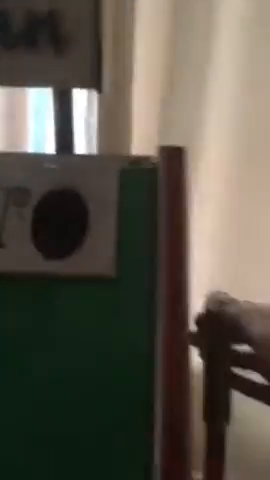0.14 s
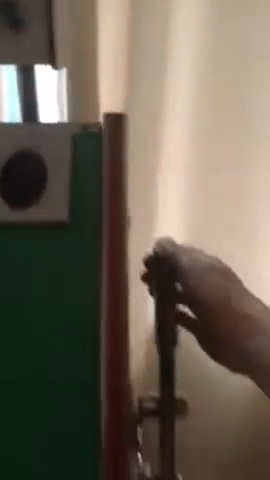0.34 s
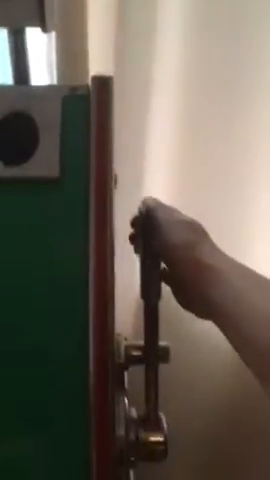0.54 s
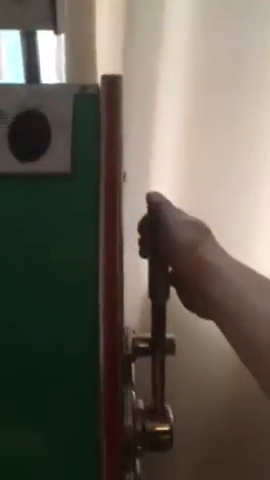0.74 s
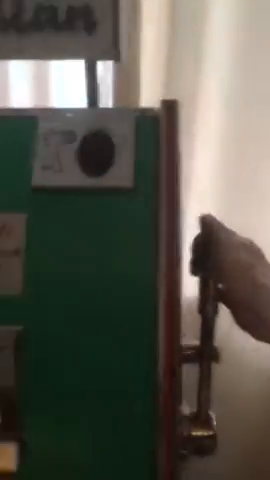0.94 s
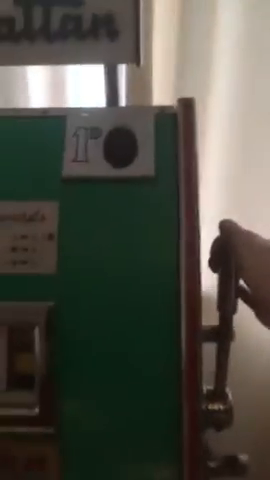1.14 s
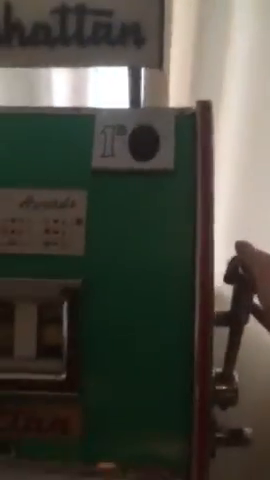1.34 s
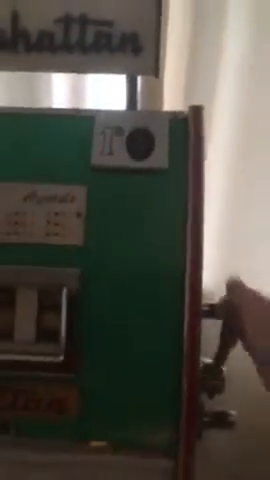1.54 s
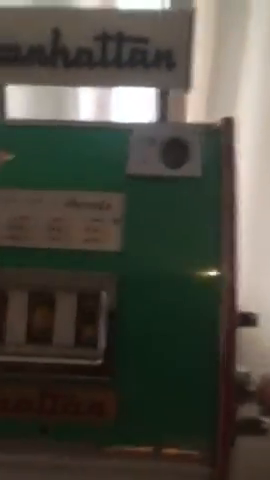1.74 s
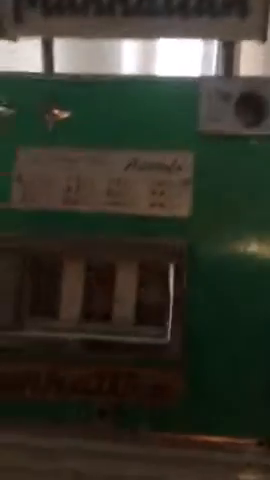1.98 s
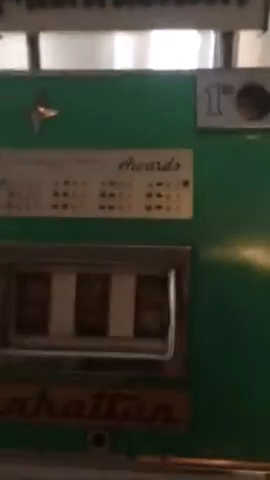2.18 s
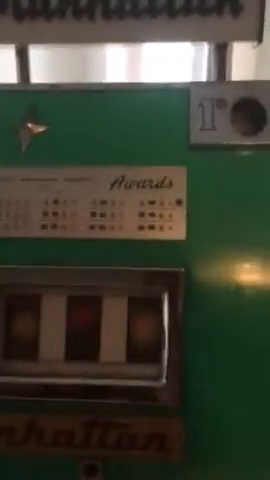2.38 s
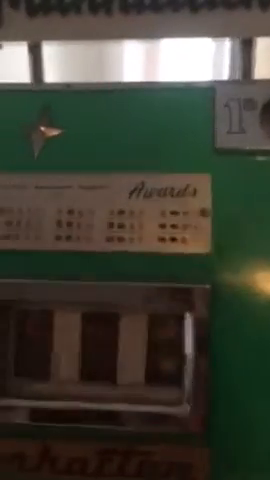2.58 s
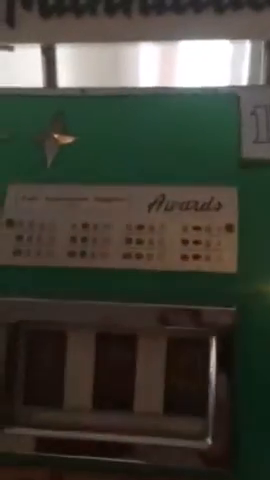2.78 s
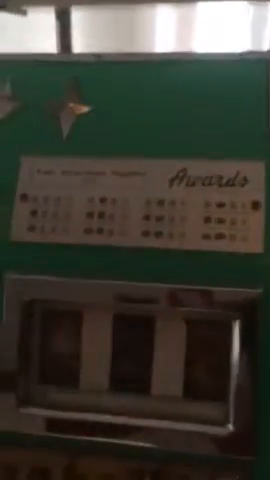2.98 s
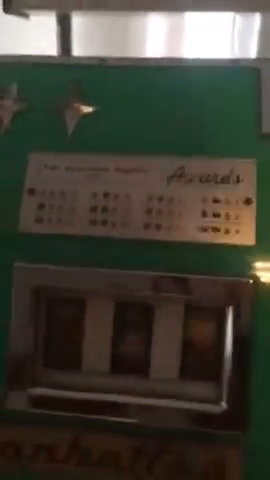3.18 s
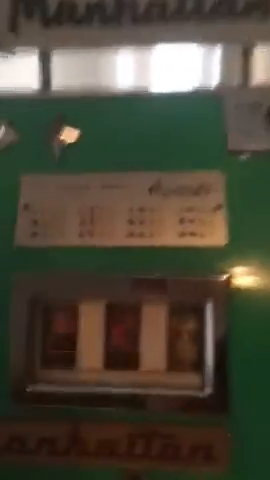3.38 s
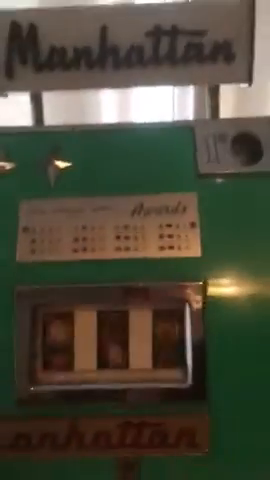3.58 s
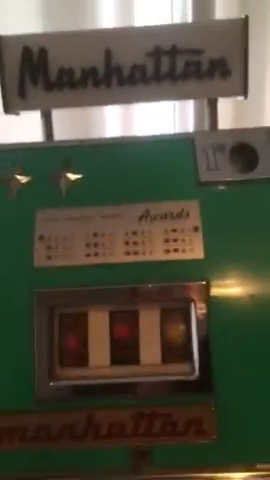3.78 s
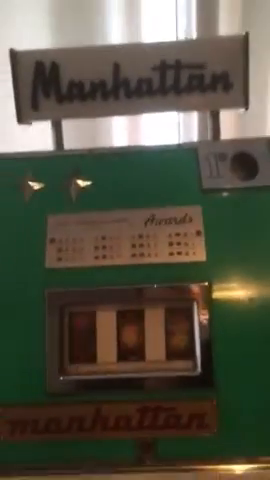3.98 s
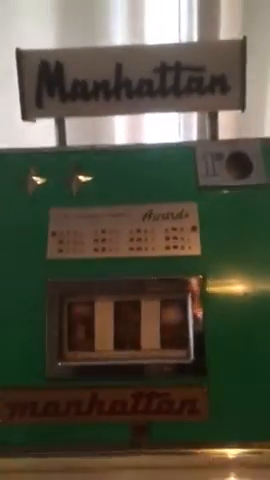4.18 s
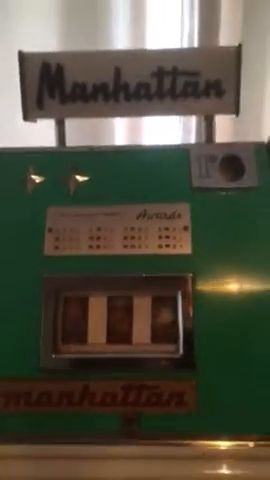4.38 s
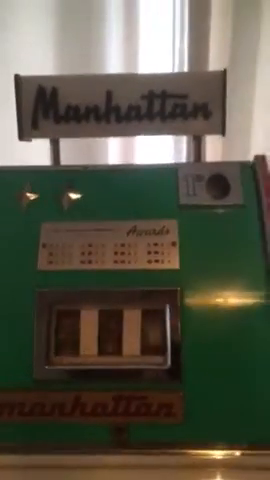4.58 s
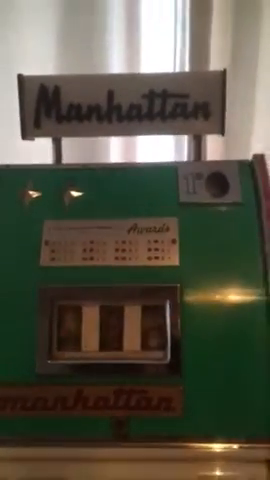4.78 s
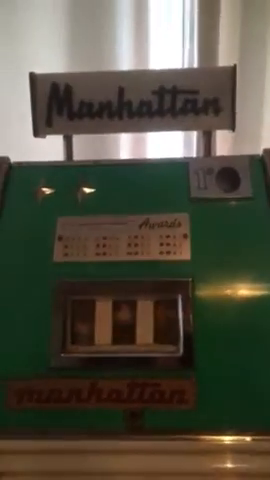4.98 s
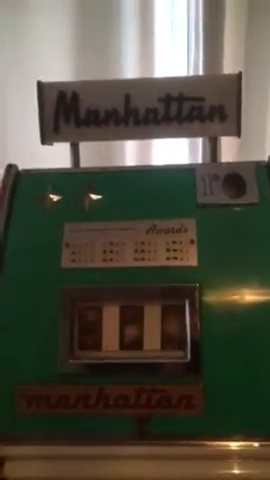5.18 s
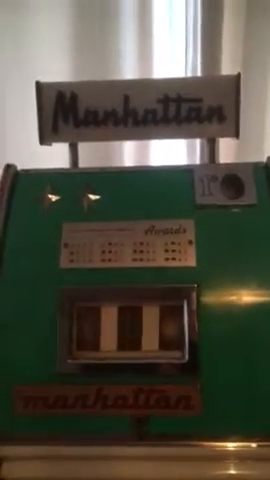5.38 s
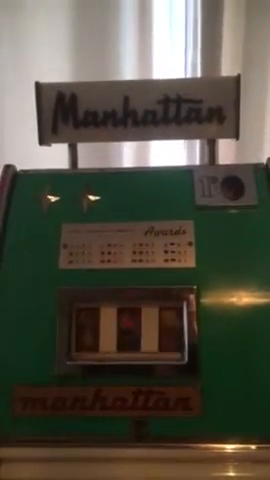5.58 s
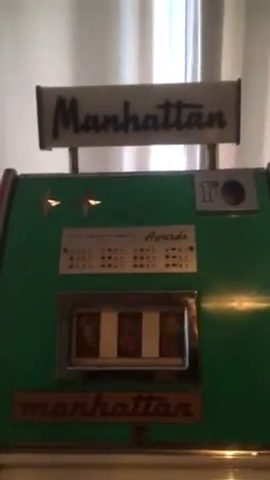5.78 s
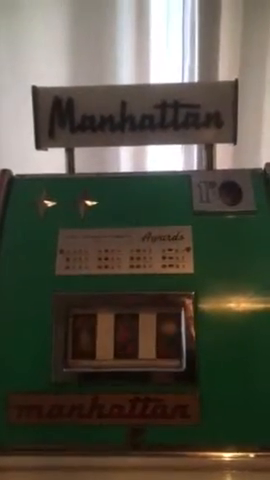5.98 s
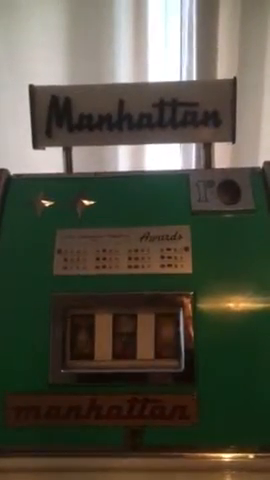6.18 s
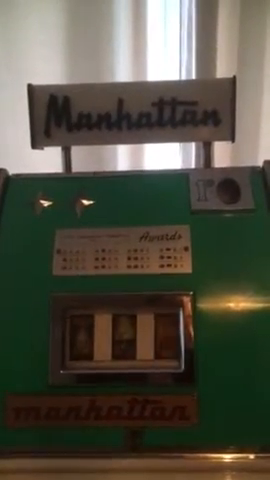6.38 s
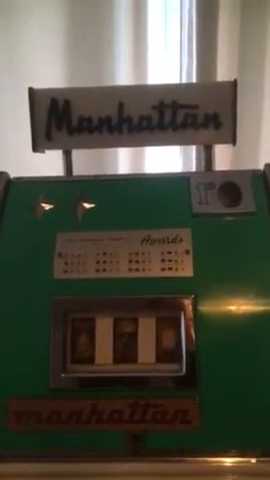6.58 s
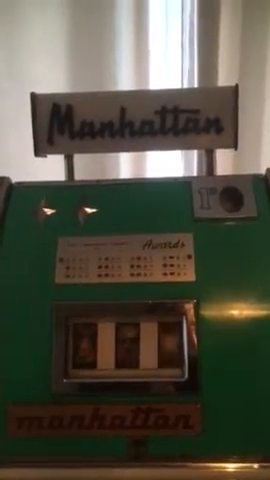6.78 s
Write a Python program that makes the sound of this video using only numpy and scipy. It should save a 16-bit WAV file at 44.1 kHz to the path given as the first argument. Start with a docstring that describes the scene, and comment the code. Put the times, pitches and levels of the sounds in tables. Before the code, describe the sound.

An old mechanical slot machine's lever rubs and ratchets, clunks hard, a coin rings down a metal chute, then the clockwork whirs and reels clack to rest.

```python
"""An old one-armed bandit in a quiet room, over steady hum and hiss made of banded noise.
The lever rubs (noise with a squeak), clicks over a ratchet and trips the mechanism with a clunk that booms
the cabinet: blows are decaying noise bands, clear notes decaying sines. The coin rings down its chute into
the cash box. A clockwork governor whirs as trains of ticks to the end; stop arms drop, and a reel
coasts on, tooth by tooth, then rocks to rest."""
import sys
import numpy as np
from scipy import signal
from scipy.fft import next_fast_len
from scipy.io import wavfile

SR = 44100
rng = np.random.default_rng(int(sys.argv[2]) if len(sys.argv) > 2 else 0)


def generate_wav(sig):
    """Save sig (samples, or channels by samples) to the path in sys.argv[1] as 16-bit PCM at SR."""
    pcm = np.round(np.clip(np.atleast_2d(sig).T, -1, 1) * 32767).astype(np.int16)
    wavfile.write(sys.argv[1], SR, pcm)


N = 301644
TIME = np.arange(N) / SR
RING_TIME = TIME[:SR * 3 // 4]
BAND_HZ = 1000 * 2 ** (np.arange(-14, 13) / 3)   # third octaves
BOUNCE_S = 0.01

# pawl drops over the ratchet teeth: start_s
RATCHET_S = [1.6013, 1.6552, 1.7, 1.7443, 1.7608, 1.8076]
# frame resonances: centre_hz, width_hz, boost_db
FRAME_PEAKS = [(429, 50, 8), (614, 9.8, 6.5), (1086, 6.3, 6), (1485, 22, 3.5)]
# colour of blows on arms and reels: band_hz, level_db (per third octave)
STOP_COLOUR = [(60, -17), (110, -17), (200, 5.5), (400, -8), (550, -14), (800, -11), (1300, -13),
               (2600, -18.5), (3600, -8.5), (5500, -8.5), (9000, -13.5), (15000, -16.5)]


def from_db(db):
    """Decibels to gain."""
    return 10 ** (np.asarray(db) / 20)


def per_band(points):
    """Spectrum (Hz, dB) read at the band centres, as a column."""
    hz, level_db = np.transpose(points)
    return np.interp(np.log(BAND_HZ), np.log(hz), level_db)[:, None]


def coloured(bands, colour):
    """Noise with the given third-octave spectrum."""
    return from_db(per_band(colour)[:, 0]) @ bands


def add(out, start_s, sound):
    """Mix a sound in at its start time."""
    at = round(start_s * SR)
    out[at:at + len(sound)] += sound[:N - at]


def noise_bands():
    """Third-octave bands of noise, each with rms 1."""
    white = rng.standard_normal((2, N + SR))
    edge = 2 ** (1 / 6)
    bands = []
    for k, hz in enumerate(BAND_HZ):
        sos = signal.butter(2, [hz / edge, hz * edge], "band", fs=SR, output="sos")
        bands.append(signal.sosfilt(sos, white[k % 2])[SR:])   # drop the filter's settling
    bands = np.array(bands)
    return bands / bands.std(axis=1, keepdims=True)


def drift(knots_per_s):
    """Random wander: straight lines between normal knots of spread 1."""
    knots = rng.standard_normal(N // 100)
    return np.interp(TIME * knots_per_s, np.arange(len(knots)), knots)


def resonate(x, peaks):
    """Two-pole resonators in parallel with the sound lift each peak in turn."""
    for hz, width_hz, boost_db in peaks:
        r = np.exp(-np.pi * width_hz / SR)
        zeros = np.array([1, 0, -1]) * (1 - r * r) / 2
        poles = [1, -2 * r * np.cos(2 * np.pi * hz / SR), r * r]
        x = x + (from_db(boost_db) - 1) * signal.lfilter(zeros, poles, x)
    return x


def ring(modes, hits, spread_db, rise_s):
    """Each hit (s, dB) sets every mode (Hz, dB, t60 s) ringing with a strength of its own."""
    hz, mode_db, t60_s = np.transpose(modes)[:, :, None]
    envelope = from_db(mode_db - 60 * RING_TIME / t60_s) * (1 - np.exp(-RING_TIME / rise_s))
    waves = envelope * np.sin(2 * np.pi * hz * RING_TIME)
    out = np.zeros(N)
    for start_s, level_db in hits:
        add(out, start_s, from_db(level_db + spread_db * rng.standard_normal(len(hz))) @ waves)
    return out


def blows(bands, hits, colour, alike, bass_slowness, tail_db, tail_t60_s, rise_cycles):
    """Hits (s, click dB, clack dB, thud dB, t60 s at 1 kHz) excite crowded modes: crack, then case and room."""
    size, hz = len(RING_TIME), BAND_HZ[:, None]
    starts = rng.integers(0, N - size, len(hits) + 1)
    body = bands[:, starts[0]:starts[0] + size]
    slow = (1000 / hz) ** bass_slowness   # low modes last longer
    rise = 1 - np.exp(-RING_TIME * hz / rise_cycles)   # and build up later
    fall = -np.log(1000) * RING_TIME / slow
    tail = from_db(tail_db) * slow * np.exp(fall / tail_t60_s)
    out = np.zeros(N)
    for at, (start_s, click_db, clack_db, thud_db, t60_s) in zip(starts[1:], hits):
        force = per_band([(230, thud_db), (500, clack_db), (1800, clack_db), (4000, click_db)])
        strength_db = force + per_band(colour)
        # the same body answers every blow, a little differently each time
        modes = np.sqrt(alike) * body + np.sqrt(1 - alike) * bands[:, at:at + size]
        envelope = rise * (np.exp(fall / t60_s) + tail)
        add(out, start_s, from_db(strength_db[:, 0]) @ (modes * envelope))
    return out


def jangle(hits, low_hz, high_hz, max_db, mean_t60_s, count):
    """Crowded steel parts ring briefly; each hit (s, click dB, clack dB) finds different ones."""
    out = np.zeros(N)
    brief = RING_TIME[:SR // 5]
    for start_s, click_db, clack_db, *_ in hits:
        place, life, force = rng.random((count, 3)).T[:, :, None]
        hz = low_hz * (high_hz / low_hz) ** place
        level_db = np.where(hz > 3000, click_db, clack_db) + max_db + 20 * np.log10(force + 1e-9)
        decay = from_db(level_db - 60 * brief / (mean_t60_s * (.5 + life)))
        add(out, start_s, np.sum(decay * np.sin(2 * np.pi * hz * brief), axis=0))
    return out


def fluttering(x, bands):
    """A note flutters in level and phase as the part that carries it turns and grazes its neighbours."""
    phase_rad = .6 * drift(knots_per_s=110)
    turned = np.real(signal.hilbert(x, next_fast_len(N))[:N] * np.exp(1j * phase_rad))
    return turned * (1 + .1 * bands[BAND_HZ < 260].sum(axis=0))


def contact(start_s, level_db, hardness_db, thud_db):
    """A blow as (s, click dB, clack dB, thud dB): hardness adds click and takes away thud."""
    return start_s, level_db + hardness_db, level_db, level_db + thud_db - 0.19 * hardness_db


def room(bands):
    """Steady hum and hiss: noise bands, played backwards."""
    # room noise: band_hz, level_db (per third octave)
    room_colour = [(30, -82), (45, -74), (70, -75.5), (110, -79.5), (200, -72.5), (320, -82), (550, -85),
                   (900, -84), (2000, -88.5), (15000, -86)]
    return coloured(bands[:, ::-1], room_colour)


def rubbing(fade_db_per_s):
    """Strength of the rub: each stroke swells, drifts in level and lets go."""
    # lever strokes: start_s, end_s, level_db
    strokes = [(0.25, 0.49, -73), (1.075, 1.64, -60), (1.642, 1.954, -57.5)]
    edge_s = 0.047
    strength = np.zeros(N)
    for start_s, end_s, level_db in strokes:
        gate = np.clip(np.minimum(TIME - start_s, end_s - TIME) / edge_s, 0, 1)
        strength += from_db(level_db - fade_db_per_s * np.clip(TIME - start_s, 0, 1)) * gate
    return strength


def lever_rub(bands):
    """The lever rubs in its bearing, which grips and eases; a faint squeak bends with the grip."""
    # rub colour: band_hz, level_db (per third octave)
    rub_colour = [(60, -18), (170, -14), (330, -16.5), (1400, -19.5), (3200, -19.5), (6000, -26),
                  (12000, -51)]
    # squeak resonances: centre_hz, width_hz, boost_db
    squeak_peaks = [(2030, 340, 14.5), (3410, 300, 6), (5400, 330, 6)]
    uneven_db, pitch_bend = 1.8, .035   # bend: share of pitch per unit of grip
    grip = drift(knots_per_s=14)
    friction = coloured(bands, rub_colour)
    bent_time = TIME + pitch_bend * np.cumsum(grip) / SR
    squeak = np.interp(bent_time, TIME, resonate(friction, squeak_peaks) - friction)
    # the squeak leads each stroke, the plain rub grows slightly
    strokes = rubbing(fade_db_per_s=-2) * friction + rubbing(fade_db_per_s=16) * squeak
    return from_db(uneven_db * grip) * strokes


def low_rumble(bands):
    """Rumble below 90 Hz builds and dies away: faint at first, then strong at a heavy jolt of the cabinet."""
    # rumbles: start_s, level_db
    rumbles = [(.48, -60), (2.81, -44.5)]
    rise_s, t60_s = 0.024, 0.97
    strength = np.zeros(N)
    for start_s, level_db in rumbles:
        age_s = np.maximum(TIME - start_s, 0)
        strength += from_db(level_db - 60 * age_s / t60_s) * (1 - np.exp(-age_s / rise_s))
    return strength * bands[BAND_HZ < 90].sum(axis=0) * .5


def linkage_hits():
    """Knocks, ratchet teeth and clunks as (s, click dB, clack dB, thud dB, t60 s)."""
    # linkage knocks: start_s, level_db, hardness_db
    knock_rows = [(0.787, -53.5, 12.5), (0.9097, -49.5, 2), (0.9157, -56, -5), (0.969, -54.5, 4.5),
                  (1.0172, -51, -7.5), (1.385, -45, -11.5), (1.399, -54, -11), (1.8837, -35, 10),
                  (1.9408, -34.5, 8), (1.9789, -27.5, 8.5), (2.0019, -27, -18)]
    # one ratchet tooth: click_db, clack_db, thud_db (thud at the first tooth)
    tooth_db = (-30.5, -37, -47.5)
    # heavy levers landing: start_s, level_db
    clunk_rows = [(1.4382, -58.5), (1.852, -43), (1.872, -36.5), (2.0795, -43.5), (2.748, -47),
                  (2.7621, -44), (2.795, -54), (2.811, -49.5)]
    # a clunk about its level: click_db, clack_db, thud_db
    clunk_db = (-2.5, 2.5, 8.5)
    winding_db_per_s = 36.5   # the thud grows as the spring is wound
    knocks = [(*contact(*row, thud_db=0), 0.061) for row in knock_rows]
    teeth = []
    for start_s in RATCHET_S:
        wound_db = winding_db_per_s * (start_s - RATCHET_S[0])
        teeth.append((start_s, *np.add(tooth_db, (0, 0, wound_db)), 0.036))
    clunks = [(start_s, *np.add(clunk_db, level_db), 0.045) for start_s, level_db in clunk_rows]
    return knocks + teeth + clunks


def linkage(bands):
    """Linkage knocks, ratchet teeth and clunks strike the frame and jangle its steel parts."""
    # blow colour: band_hz, level_db (per third octave)
    knock_colour = [(60, -24), (110, -13.5), (190, 2), (330, -15), (600, -13), (1200, -6), (2100, -10.5),
                    (3300, -8.5), (5500, -14), (9000, -12.5), (15000, -22.5)]
    hits = linkage_hits()
    knocks = blows(bands, hits, knock_colour, alike=0.52, bass_slowness=0.19,
                   tail_db=-11.0, tail_t60_s=0.34, rise_cycles=2.43)
    metal = jangle(hits, low_hz=912, high_hz=10510, max_db=-16, mean_t60_s=0.07, count=24)
    return resonate(knocks, FRAME_PEAKS) + metal


def pings(bands):
    """Struck steel parts sing out as decaying sines: first the mechanism, then what the coin meets."""
    # modes: pitch_hz, level_db, t60_s; hits: start_s, level_db
    # latch, as the lever takes up its slack
    latch_modes = [(2020, -1.5, 0.094), (2480, 0, 0.056)]
    latch_hits = [(0.79, -49), (1.019, -47.5)]
    # pawl, on every tooth
    pawl_modes = [(946, -1.5, 0.047), (2520, -2, 0.081), (3066, 0.45, 0.069)]
    pawl_hits = [(start_s, -42.5) for start_s in RATCHET_S]
    # catch, snapping in near the end of the pull
    catch_modes = [(946, 2.5, 0.044), (3560, -3, .085), (9421, -6, 0.079)]
    catch_hits = [(1.763, -31.5)]
    # kicker
    kicker_modes = [(603, 1, 0.17), (1050, 4.5, 0.093), (1405, -8, 0.28), (1500, 2, 0.25),
                    (5590, 14.5, 0.022)]
    kicker_hits = [(1.981, -35.5)]
    # gate
    gate_modes = [(2820, 4, 0.092), (4600, -9, 0.14), (4700, -4, 0.18), (9130, -2.5, 0.31)]
    gate_hits = [(2.146, -39.5), (2.26, -39.5)]
    # coin grazing on its rim
    rim_modes = [(5800, 0, 0.28)]
    rim_hits = [(2.343, -40.5), (2.465, -38.5)]
    # chute
    chute_modes = [(3390, -5, 0.29), (4300, -9.5, 0.2), (6600, -6.5, 0.2)]
    chute_hits = [(2.351, -34)]
    # lip
    lip_modes = [(6600, -9, .09), (9335, -3, .15), (14030, -10, .13)]
    lip_hits = [(2.478, -34), (2.493, -40)]
    # cash box
    box_modes = [(1275, -8.5, 0.037), (2365, -6, 0.087), (3100, -4.5, 0.034), (3550, -1.5, 0.024)]
    box_hits = [(2.638, -29)]
    parts = [(latch_modes, latch_hits), (pawl_modes, pawl_hits), (catch_modes, catch_hits),
             (kicker_modes, kicker_hits), (gate_modes, gate_hits), (rim_modes, rim_hits),
             (chute_modes, chute_hits), (lip_modes, lip_hits), (box_modes, box_hits)]
    notes = sum(ring(modes, hits, spread_db=1.5, rise_s=.001) for modes, hits in parts)
    return fluttering(notes, bands)


def cabinet():
    """Heavy parts shake the cabinet: each thump favours the panels near its own pitch."""
    # panel modes: pitch_hz, level_db, t60_s
    panels = [(76.6, -18, 0.51), (141, -6, 0.16), (163, -1.5, 0.38), (207.4, -1.5, 0.35), (246, -4, 0.07),
              (338.2, -6, 0.066), (416, -14, 0.22)]
    # thumps: start_s, level_db, pitch_hz
    thumps = [(1.035, -44.5, 160), (1.184, -40.5, 168), (1.458, -38.5, 190), (1.876, -34, 268),
              (1.895, -36.5, 158), (1.984, -24.5, 264), (2.003, -19, 150), (2.023, -25, 206),
              (2.06, -30.5, 182), (2.14, -26, 212), (2.19, -34, 145), (2.518, -37.5, 206),
              (2.642, -35.5, 177), (2.754, -39.5, 163), (2.79, -28.5, 126), (2.821, -26, 208),
              (6.55, -41, 127)]
    off_pitch_db_per_octave = 25.5   # up to half an octave
    out = np.zeros(N)
    for start_s, level_db, pitch_hz in thumps:
        modes = []
        for hz, panel_db, t60_s in panels:
            off_octaves = min(abs(np.log2(hz / pitch_hz)), .5)
            modes.append((hz, panel_db - off_pitch_db_per_octave * off_octaves, t60_s))
        out += ring(modes, [(start_s, level_db)], spread_db=1.5, rise_s=0.0019)
    return out


def coin(bands):
    """The coin tumbles down the steel chute; its disc modes ring longer the longer it flies free."""
    # coin strikes: start_s, level_db, hardness_db, ring_db
    strikes = [(2.120, -36.5, 10.5, -53), (2.136, -30.5, -1.5, -28.5), (2.175, -33.5, 1.5, -44),
               (2.261, -50.5, 12, -50.5), (2.33, -44.5, 10, -60.5), (2.342, -38, 11.5, -42),
               (2.351, -45.5, 13.5, -29.5), (2.431, -55.5, 11.5, -38), (2.478, -55.5, 12, -45),
               (2.493, -50, 7, -44), (2.519, -42, 12, -23), (2.5286, -44, 20, -13), (2.543, -56, 8, -37),
               (2.574, -66, 9, -37.5), (2.597, -45.5, 7, -37.5), (2.637, -39.5, -3.5, -69.5)]
    # contact colour: band_hz, level_db (per third octave)
    contact_colour = [(60, -24), (190, 1.5), (400, -19.5), (1200, -8.5), (2400, -9), (4000, -18.5),
                      (7500, -10), (15000, -24)]
    # disc modes, some in close beating groups: pitch_hz
    disc_hz = [5655, 9852, 9871, 9770, 12900, 12922]
    # disc modes about ring_db: level_db
    disc_db = [-9.5, 0.5, -11, -16.5, -14.5, -9.5]
    t60_per_flight, rests_s = 3.1, 2.66
    hits = [(*contact(*row[:3], thud_db=-3), 0.092) for row in strikes]
    clatter = blows(bands, hits, contact_colour, alike=0.38, bass_slowness=0.16,
                    tail_db=-11.5, tail_t60_s=0.37, rise_cycles=2.8)
    chute = jangle(hits, low_hz=4200, high_hz=15770, max_db=-20.5, mean_t60_s=.12, count=60)
    flights_s = np.diff([row[0] for row in strikes] + [rests_s])
    disc = np.zeros(N)
    for (start_s, _, _, ring_db), flight_s in zip(strikes, flights_s):
        modes = [(hz, db, t60_per_flight * flight_s) for hz, db in zip(disc_hz, disc_db)]
        disc += ring(modes, [(start_s, ring_db)], spread_db=1.0, rise_s=0.004)
    return resonate(clatter, FRAME_PEAKS) + chute + fluttering(disc, bands)


def governor(bands):
    """The timing fan ticks three times a turn, over the low rush of the spinning reels."""
    # ticks in each turn: level_db
    tick_db = [0, -3, -11]
    # whir colour: band_hz, level_db (per third octave)
    whir_colour = [(60, -31), (200, -6.5), (330, -15.5), (650, -18), (950, -16), (2400, -12.5), (3200, -16),
                   (4500, -20), (7000, -21.5), (15000, -37.5)]
    # whir resonances: centre_hz, width_hz, boost_db
    whir_peaks = [(212.9, 4.2, 12), (796.3, 10, 18), (910, 44, 13.4), (1130, 190, 4.5), (1450, 160, 4.5),
                  (1830, 20, 5.5), (2020, 40, 6.6), (2384, 120, 6.5), (2567, 120, 9), (3880, 170, 9.1)]
    start_s, turns_per_s = 2.5585, 39.48
    uneven_db, jitter_s, tick_t60_s = 1.9, .0009, .048
    gain_db, rise_s, fade_db_per_s = -56.5, .07, 1

    gap_s = 1 / turns_per_s / len(tick_db)
    times = np.arange(start_s, TIME[-1] - gap_s, gap_s)
    at = ((times + jitter_s * rng.standard_normal(len(times))) * SR).astype(int)
    ticks = np.zeros(N)
    ticks[at] = from_db(np.resize(tick_db, len(at)) + uneven_db * rng.standard_normal(len(at)))

    # low notes ring through the gaps between ticks
    gain = from_db(per_band(whir_colour)[:, 0])
    crisp = 1 / (1 + (450 / BAND_HZ) ** 4)   # split at 450 Hz
    treble, bass = resonate(np.array([gain * crisp, gain * (1 - crisp)]) @ bands, whir_peaks)

    # a tick is part scrape, never the same twice, and part knock on the same frame
    decay = from_db(-60 * RING_TIME / tick_t60_s)
    scrape = signal.fftconvolve(ticks, decay)[:N] * treble
    knock = signal.fftconvolve(ticks, decay * treble[:len(decay)])[:N]

    age_s = np.maximum(TIME - start_s, 0)
    strength = from_db(gain_db - fade_db_per_s * age_s) * (1 - np.exp(-age_s / rise_s))
    return strength * ((knock + bass) / 2 + .8 * scrape)


def stop_arms(bands):
    """The stop arms fall into the star wheels, bounce once and ring the frame."""
    # arm landings: start_s, level_db, hardness_db
    stops = [(3.4175, -52, -15), (4.7026, -37, 0), (6.5299, -37.5, -5.5), (6.7126, -45, -15)]
    # resonances: centre_hz, width_hz, boost_db
    stop_peaks = [(633, 11, 15), (1480, 100, 7.1), (2320, 130, 11), (3220, 170, 7.4)]
    bounce_loss_db = 9
    hits = []
    for start_s, level_db, hardness_db in stops:
        for k in range(2):
            landing = contact(start_s + k * BOUNCE_S, level_db - k * bounce_loss_db, hardness_db, thud_db=-11.5)
            hits.append((*landing, 0.055))
    frame = blows(bands, hits, STOP_COLOUR, alike=0.76, bass_slowness=0.18,
                  tail_db=-13.5, tail_t60_s=0.29, rise_cycles=2.3)
    metal = jangle(hits, low_hz=996, high_hz=3790, max_db=-21, mean_t60_s=0.24, count=16)
    return resonate(frame, stop_peaks) + metal


def coasting():
    """The arm drops off each tooth and meets the next; drops spread out and soften as the reel slows."""
    # drop at full speed: click_db, clack_db, thud_db
    drop_db = (-56, -43, -46)
    # rebound at full speed: click_db, clack_db, thud_db
    rebound_db = (-56, -42.5, -54.5)
    start_s, first_tooth_s, teeth_to_rest, slowing_power = 4.7016, .07085, 8.247, .2094
    rebound_s, sooner_s_per_tooth = .0355, 0.0015
    drop_db_per_octave, rebound_db_per_octave = 4.5, 6   # softening per halving of speed
    speed = (1 - np.arange(int(teeth_to_rest) + 1) / teeth_to_rest) ** slowing_power
    tooth_times = start_s + np.cumsum(first_tooth_s / speed)
    drops = []
    rebounds = [(start_s + rebound_s, *rebound_db)]   # follows the stop arm's own blow
    for k, (tooth_s, octaves) in enumerate(zip(tooth_times, np.log2(speed)), 1):
        meeting_s = tooth_s + rebound_s - k * sooner_s_per_tooth
        drops.append((tooth_s, *np.add(drop_db, drop_db_per_octave * octaves)))
        rebounds.append((meeting_s, *np.add(rebound_db, rebound_db_per_octave * octaves)))
    return drops, rebounds


def arm_chatter(bands, drops, rebounds):
    """The arm's tip clicks ahead of each drop and clatters ahead of all but the first and last rebound."""
    # slip colour: band_hz, level_db (per third octave)
    slip_colour = [(500, -40), (1300, -20), (2600, -7), (3800, 2), (5500, -5.5), (9000, -7), (15000, -13.5)]
    lead_s, clatter_db = 0.0024, -56.5
    slips = [(start_s - lead_s, click_db, click_db, click_db, 0.037) for start_s, click_db, *_ in drops]
    clicks = blows(bands, slips, slip_colour, alike=0.22, bass_slowness=0.14,
                   tail_db=-14.0, tail_t60_s=0.16, rise_cycles=4.6)
    meetings = [(start_s - lead_s, clatter_db, clatter_db) for start_s, *_ in rebounds[1:-1]]
    return clicks + jangle(meetings, low_hz=1424, high_hz=4670, max_db=-4.5, mean_t60_s=0.075, count=10)


def stuttering(touches):
    """The arm never lands cleanly: a weaker touch follows each one after an uneven gap."""
    gaps_s = BOUNCE_S * (.5 + rng.random(len(touches)))
    return [(start_s + gap_s, *np.subtract(levels_db, 5))
            for (start_s, *levels_db), gap_s in zip(touches, gaps_s)]


def rocking():
    """The reel swings between two teeth, touching each in turn, in shorter swings that fade ever faster."""
    # soft side, then hard side: click_db, clack_db, thud_db
    sides_db = [(-67, -43.5, -54), (-53.5, -47, -54.5)]
    # loss, times the touch number squared: click_db, clack_db, thud_db
    loss_db = (0.9, 0.37, 1)
    start_s, first_swing_s, shrink = 5.7734, .1972, .7408
    touches = []
    for k in range(5):
        touch_s = start_s + first_swing_s * (1 - shrink ** k) / (1 - shrink)
        touches.append((touch_s, *np.subtract(sides_db[k % 2], np.multiply(k * k, loss_db))))
    return touches


def reel(bands):
    """A tin reel drum rings at every touch as it coasts and rocks to rest."""
    # drum resonances: centre_hz, width_hz, boost_db
    reel_peaks = [(165.4, 9.2, 10), (257, 43, 11.2), (631, 5.8, 7), (857, 51, 13.3), (2350, 110, 12.3),
                  (3550, 410, 10.5)]
    # clear drum notes: pitch_hz, level_db (about the clack), t60_s
    drum_modes = [(616, -9, 0.12), (800, -4, 0.075)]
    drops, rebounds = coasting()
    touches = rebounds + rocking()
    hits = [(*row, 0.037) for row in drops + touches + stuttering(touches)]
    drum = blows(bands, hits, STOP_COLOUR, alike=0.6, bass_slowness=0.046,
                 tail_db=-14.5, tail_t60_s=0.24, rise_cycles=2.75)
    note_hits = [(start_s, clack_db) for start_s, _, clack_db, *_ in hits]
    notes = ring(drum_modes, note_hits, spread_db=3, rise_s=0.0016)
    return resonate(drum, reel_peaks) + notes + arm_chatter(bands, drops, rebounds)


def scene():
    """The machine over the hum of the room, in one channel."""
    bands = noise_bands()
    lever = lever_rub(bands) + linkage(bands) + pings(bands) + cabinet()
    play = coin(bands) + governor(bands) + stop_arms(bands) + reel(bands)
    return (room(bands) + low_rumble(bands) + lever + play)[None]


def record(dry):
    """A steep low-pass cuts the top above 16.2 kHz."""
    return signal.sosfilt(signal.ellip(10, .1, 80, 16200, fs=SR, output="sos"), dry)


dry = scene()
out = record(dry)
generate_wav(out)
```